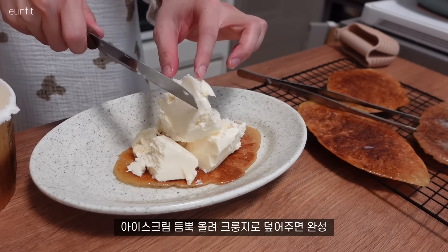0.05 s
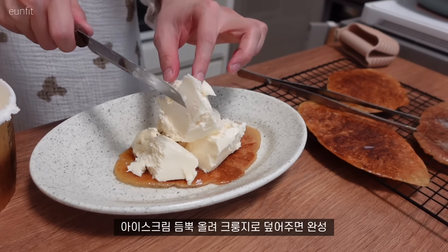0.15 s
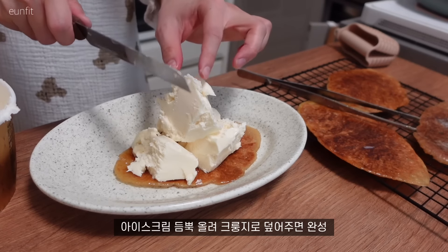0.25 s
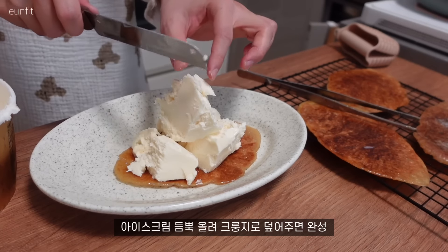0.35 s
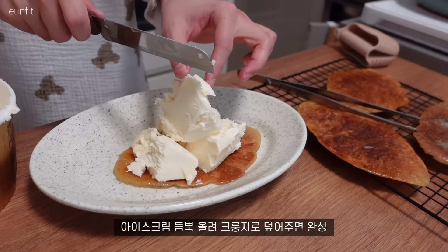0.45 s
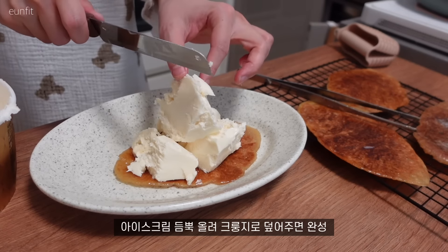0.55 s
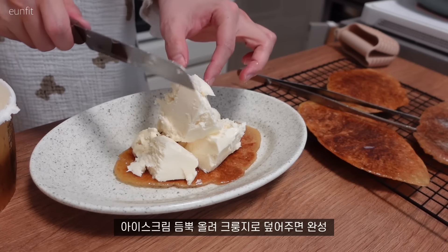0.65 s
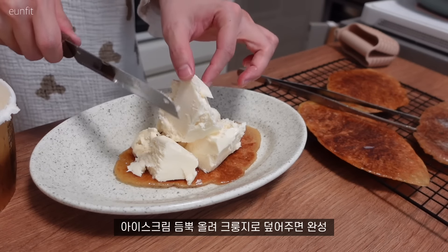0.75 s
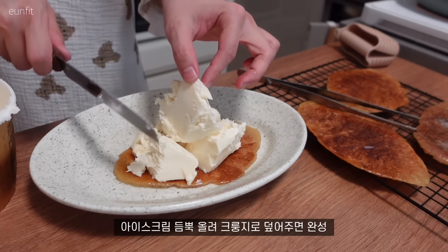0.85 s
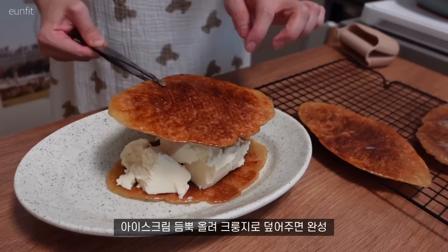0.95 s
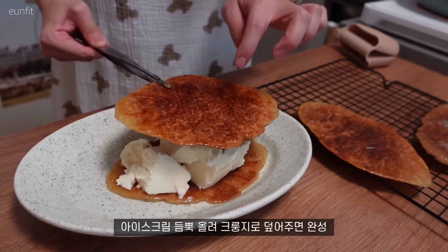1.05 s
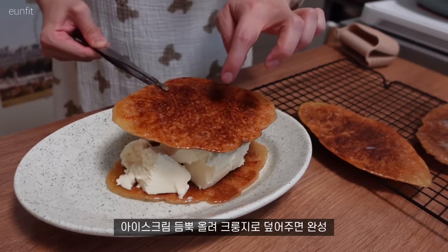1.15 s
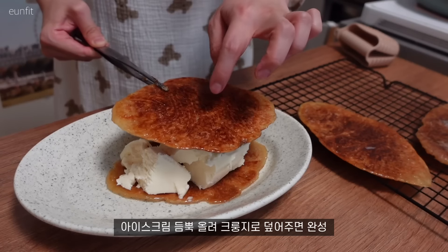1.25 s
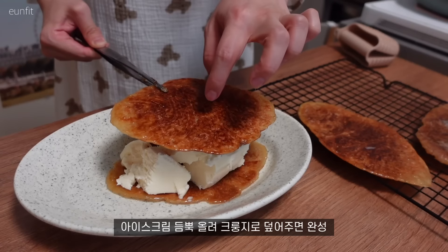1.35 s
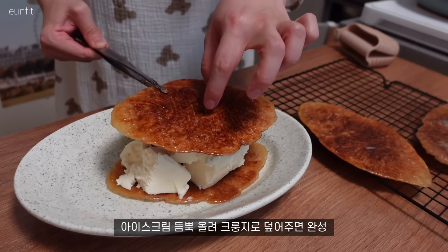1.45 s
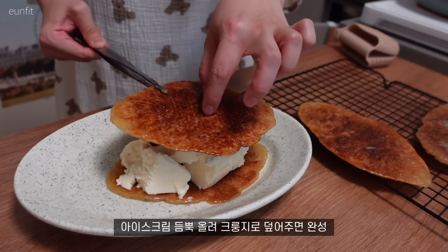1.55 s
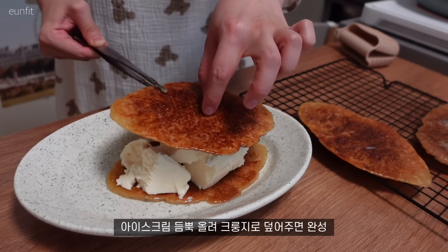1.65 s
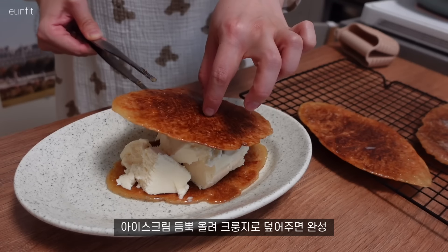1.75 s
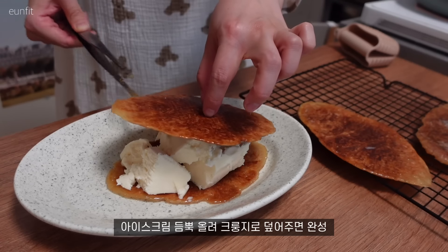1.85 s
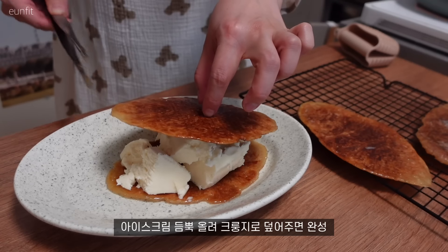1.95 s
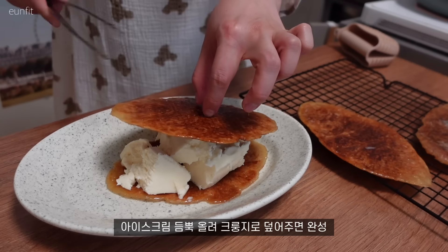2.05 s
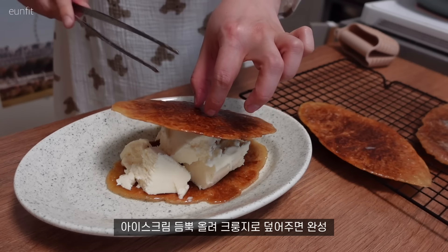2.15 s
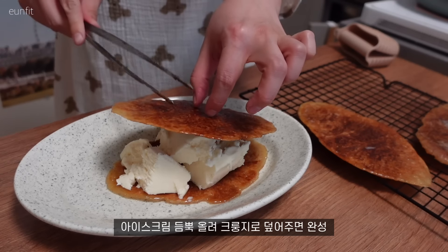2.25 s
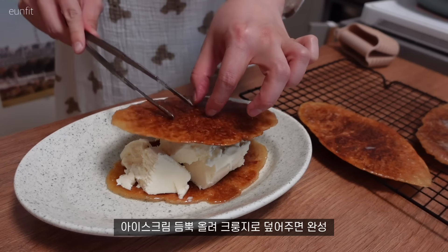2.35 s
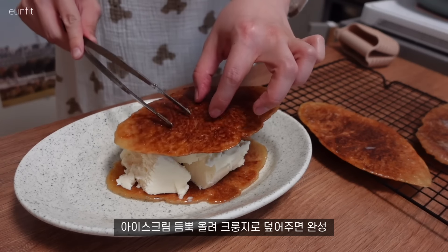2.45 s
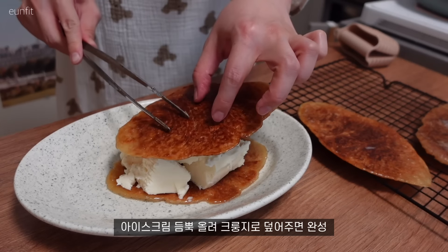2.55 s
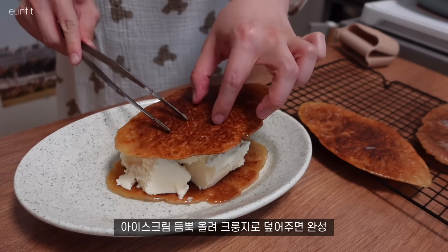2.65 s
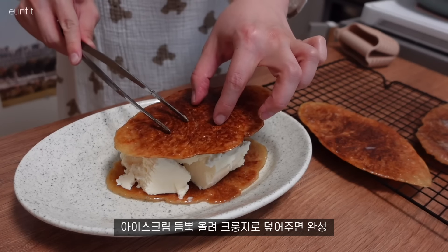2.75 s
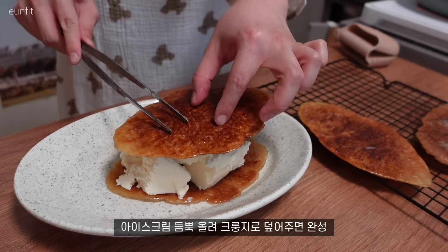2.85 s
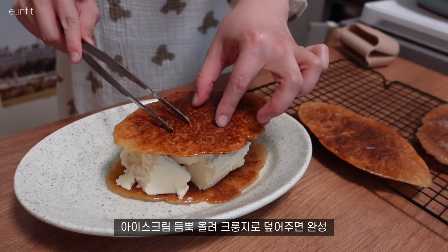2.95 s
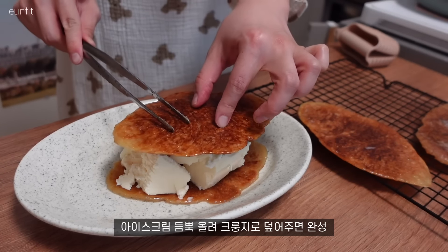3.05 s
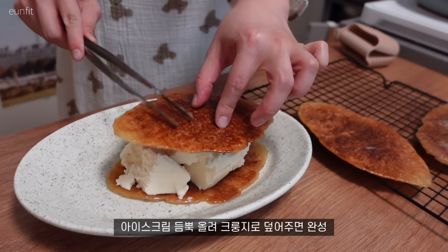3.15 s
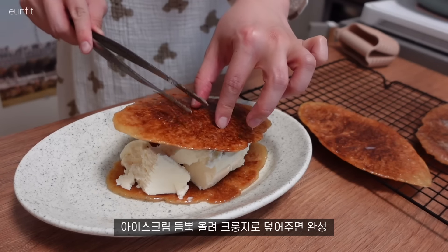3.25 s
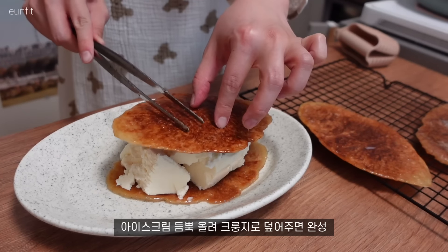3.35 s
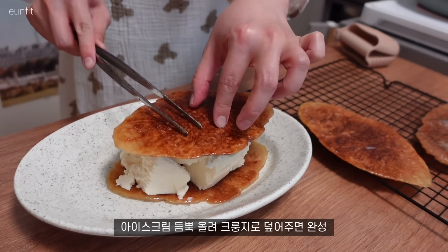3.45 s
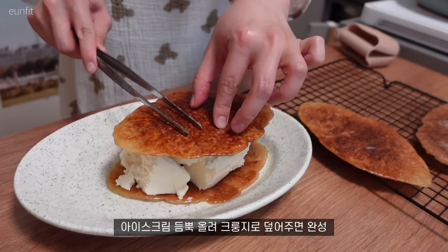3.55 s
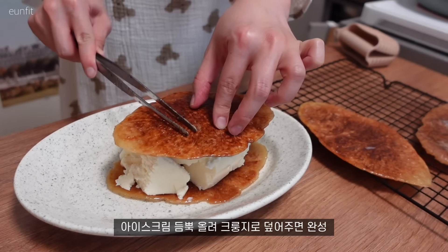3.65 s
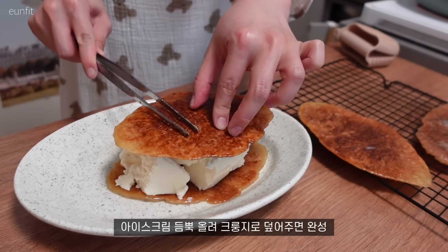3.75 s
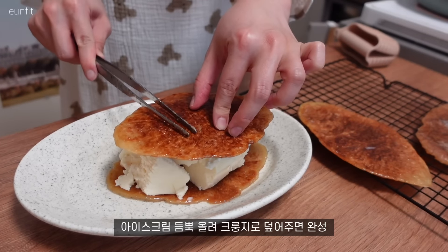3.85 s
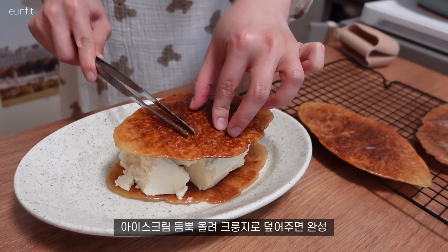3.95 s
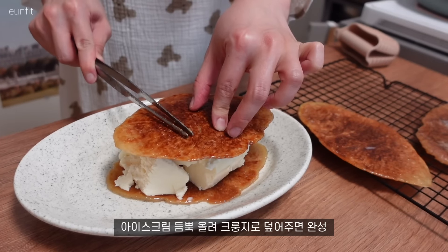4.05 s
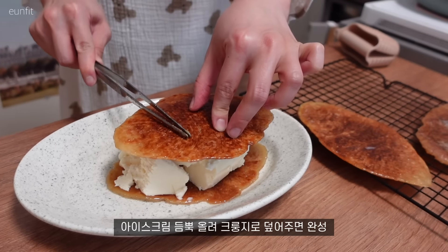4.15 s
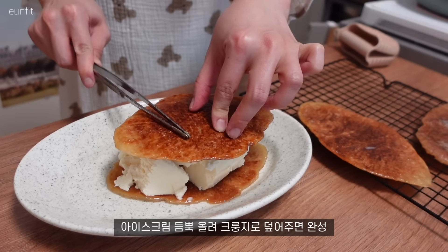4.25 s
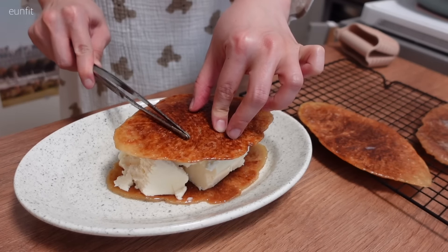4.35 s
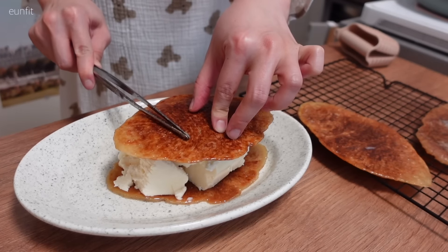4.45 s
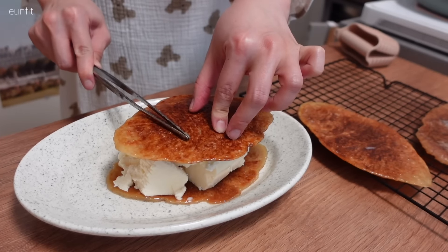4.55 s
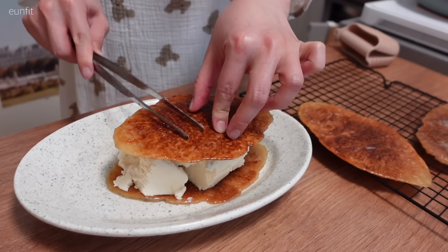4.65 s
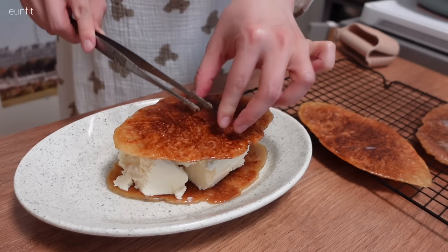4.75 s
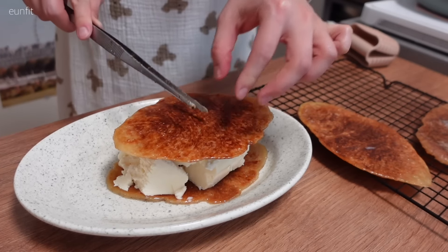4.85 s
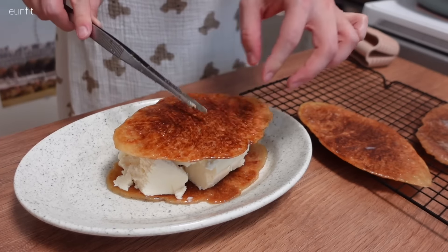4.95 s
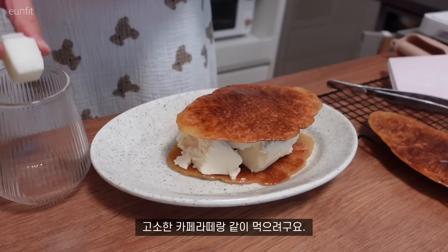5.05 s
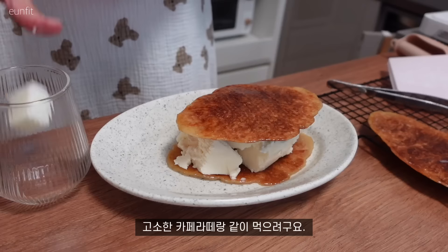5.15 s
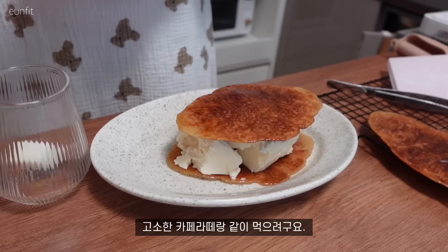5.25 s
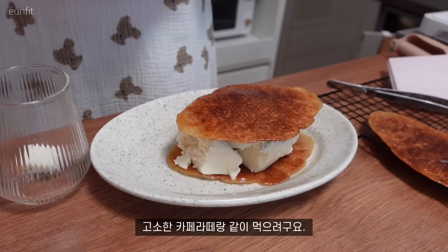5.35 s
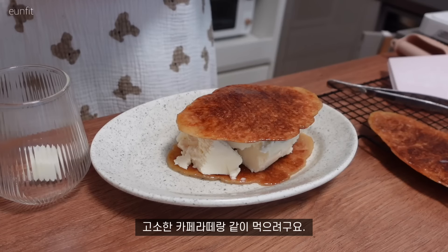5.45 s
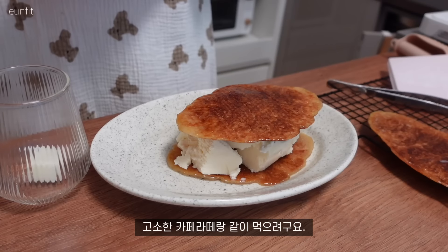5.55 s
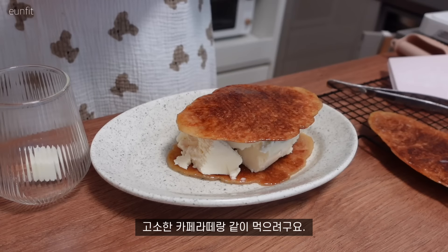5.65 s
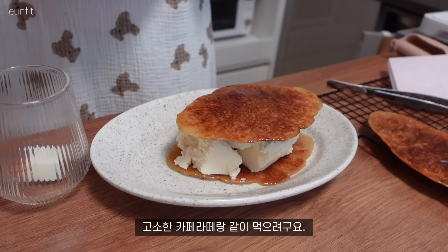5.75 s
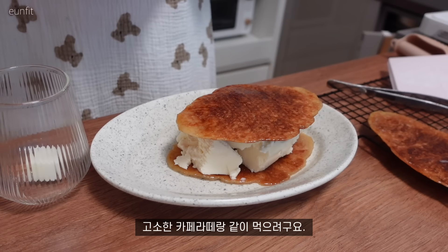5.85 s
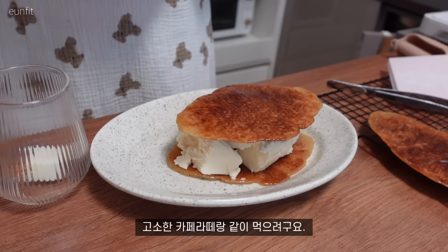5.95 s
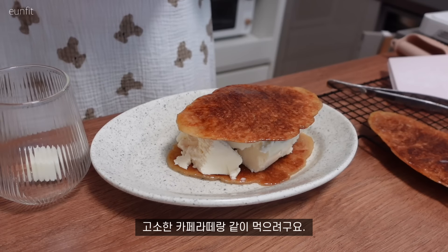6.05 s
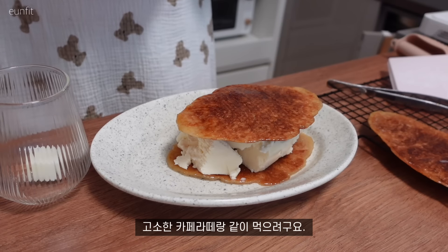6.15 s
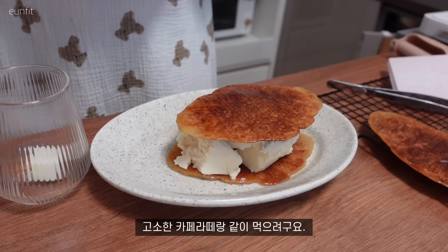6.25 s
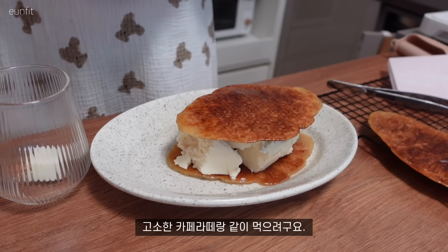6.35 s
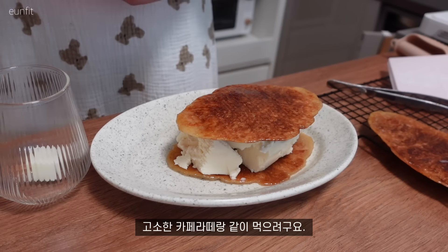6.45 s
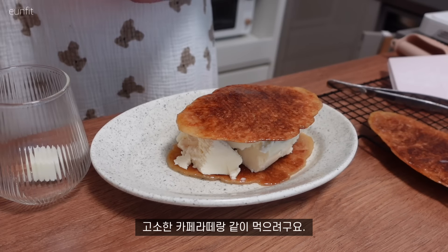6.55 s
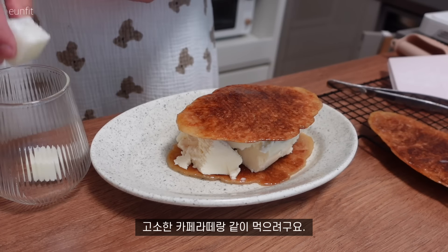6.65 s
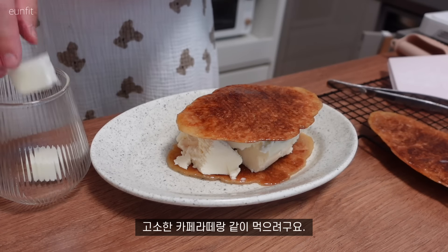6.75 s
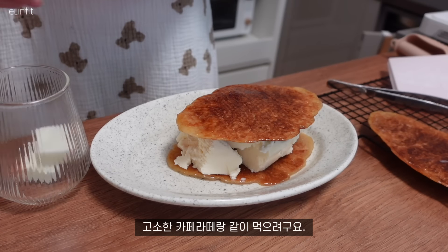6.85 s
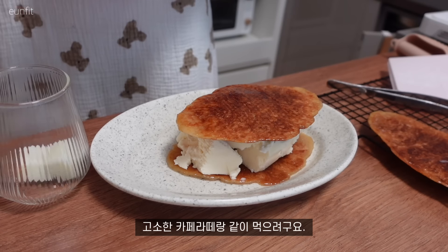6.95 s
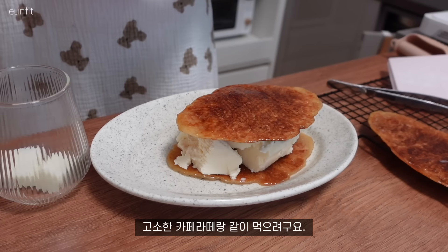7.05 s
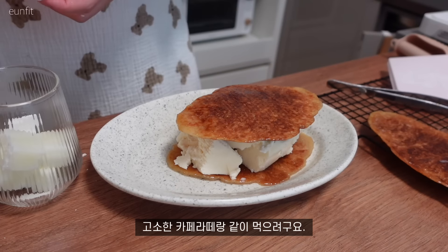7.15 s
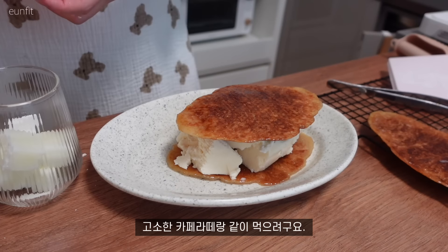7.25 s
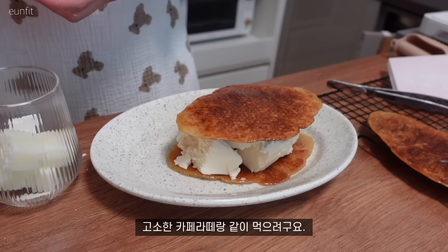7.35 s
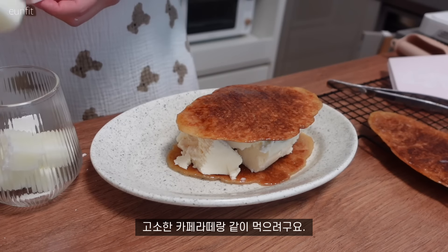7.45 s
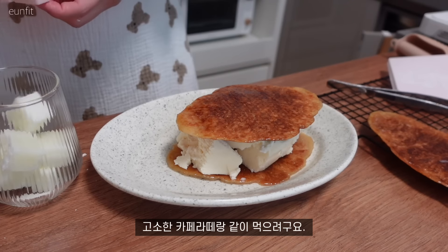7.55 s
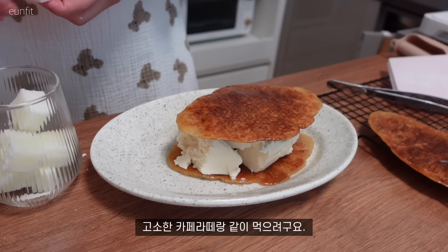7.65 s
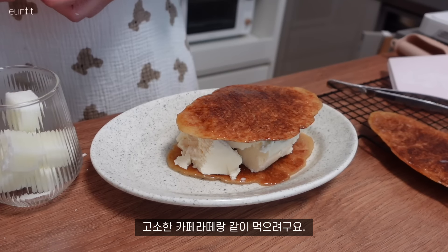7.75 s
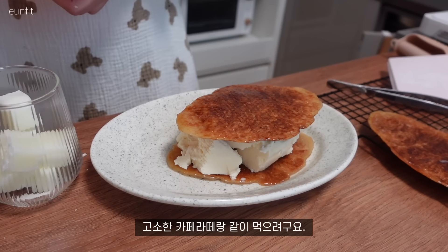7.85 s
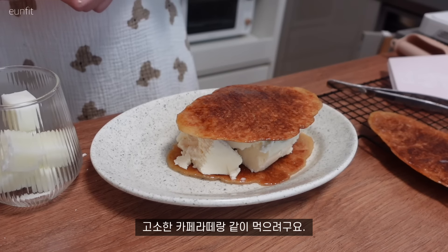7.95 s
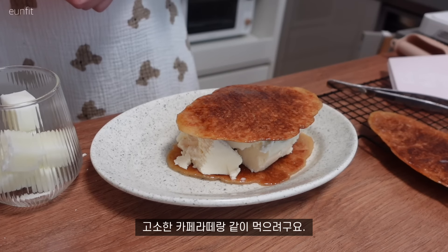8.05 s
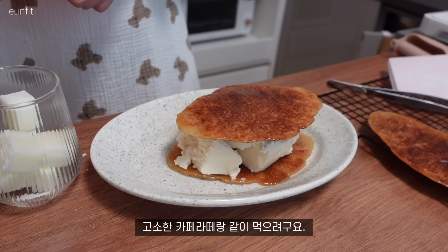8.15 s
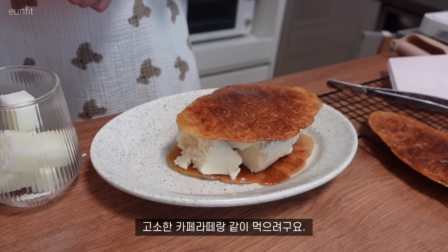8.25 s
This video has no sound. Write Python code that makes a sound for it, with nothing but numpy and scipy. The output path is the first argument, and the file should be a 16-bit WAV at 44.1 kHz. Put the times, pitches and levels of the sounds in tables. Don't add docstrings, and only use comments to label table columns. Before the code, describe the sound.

Quiet kitchen with dry taps and brittle crust cracking, followed by loud ringing ice drops into a glass, the last ones duller on piled ice.

```python
import sys
import numpy as np
from scipy import signal
from scipy.io import wavfile
from scipy.ndimage import uniform_filter1d

SR = 44100
rng = np.random.default_rng(int(sys.argv[2]) if len(sys.argv) > 2 else 0)


def gain_from_db(level_db):
    decades = np.asarray(level_db, float) / 20
    return 10 ** decades


def waveform_to_disk(signal):
    frames = np.transpose(np.atleast_2d(signal))
    scaled = np.clip(frames, -1, 1) * 32767
    samples = np.round(scaled).astype(np.int16)
    wavfile.write(sys.argv[1], SR, samples)


N = 366030


def evened(x):
    return x / np.sqrt(np.mean(x ** 2) + 1e-20)


def read(points, hz):
    f, value = np.transpose(points)
    return np.interp(np.log(hz + 1), np.log(f + 1), value)


def add(mix, s, sound):
    part = mix[round(s * SR):][:len(sound)]
    part += sound[:len(part)]


# [f/Hz, likeness 0-1]
LIKENESS = [(60, 0.24), (180, 0.73), (550, 0.64), (1650, 0.64), (4970, 0.72), (15000, 1)]


def noise(spectrum, patchy_db):
    frames = N // 256 + 5
    hz = np.fft.rfftfreq(1024, 1 / SR)
    a, b, c, d, patches = rng.standard_normal((frames, 513, 5)).T
    patches = uniform_filter1d(patches, size=10, axis=0)
    patches = evened(uniform_filter1d(patches, size=14, axis=1))
    same = read(LIKENESS, hz)[:, None]
    left = a + 1j * b
    right = same * left + np.sqrt(1 - same ** 2) * (c + 1j * d)
    gain = gain_from_db(read(spectrum, hz)[:, None] + patchy_db * patches)
    sound = signal.istft(np.array([left, right]) * gain, nperseg=1024, noverlap=768)[1]
    return evened(sound[:, :N])


# [f/Hz, level/dB]
HUSH = [(25, -55.5), (103, -11), (208, 2.5), (358, -2.5), (620, -15), (1200, -18.5), (7710, -32.5),
        (15200, -30)]
# [f/Hz, level/dB]
CLOTH = [(240, -30.5), (400, 4), (875, -2), (1250, 0.5), (3580, -11), (5980, -13), (12000, -19.5),
         (15600, -49)]
# [middle t/s, length t/s, level/dB]
GESTURES = [
    (1.13, 0.43, -56),
    (2.52, 0.6, -61),
    (3.528, 0.74, -60),
    (5.311, 1.7, -59.5),
    (6.46, 1.05, -57.5),
    (7.199, 0.46, -54),
    (7.894, 0.56, -59),
]
# [f/Hz, width f/Hz, level/dB]
HUM = [
    (360, 8.6, -71),
    (150, 60, -72),
]
# [f/Hz, width f/Hz, level/dB]
WHINE = (15680, 150, -86)
# [t/s, level/dB, f/Hz, length t/s]
BUMPS = [
    (1.128, -59.5, 120.8, 0.21),
    (4.188, -59, 150, 0.4),
    (6.937, -53, 56, 0.092),
    (7.125, -52, 40.3, .03),
    (7.617, -62, 44.2, 0.054),
    (7.961, -54.5, 665, 0.023),
    (8.036, -48, 684, 0.013),
    (8.17, -55, 684, 0.018),
]


def air():
    t = np.arange(N) / SR
    effort = gain_from_db(-59.5)
    for s, length, db in GESTURES:
        effort = effort + gain_from_db(db) * np.exp(-(2 * (t - s) / length) ** 2)
    rustle = gain_from_db(-9.0) * effort * noise(CLOTH, patchy_db=3.0)
    tones = np.zeros(N)
    for hz, width, db in (*HUM, WHINE):
        waver = uniform_filter1d(rng.standard_normal((2, N)), size=int(SR / width))
        tone = waver[0] * np.cos(2 * np.pi * hz * t) + waver[1] * np.sin(2 * np.pi * hz * t)
        tones += gain_from_db(db) * evened(tone)
    for s, db, hz, length in BUMPS:
        tones += gain_from_db(db) * np.exp(-(2 * (t - s) / length) ** 2) * np.sin(2 * np.pi * hz * t)
    hush = gain_from_db(-61 + 0.85) * noise(HUSH, patchy_db=2.36)
    return (hush + rustle + tones) * gain_from_db([[.45], [-.45]])


# [f/Hz, t/s]
ROOM = [(150, 0.18), (600, 0.44), (2000, 0.4), (6000, 0.34), (14000, 0.29)]


def room(x, apart, swell_s):
    taps = np.zeros((2, 30000))
    at = np.arange(200, 30000, 20) + rng.integers(0, 20, (2, 1490))
    np.put_along_axis(taps, at, rng.choice([-1., 1.], at.shape), 1)
    hz, t, z = signal.stft(taps, SR, nperseg=256)
    z = z * gain_from_db(-60 * t / read(ROOM, hz)[:, None]) * (1 - np.exp(-t / swell_s))
    mid, side = signal.istft(z, SR, nperseg=256)[1]
    tail = np.array([mid + apart * side, mid - apart * side])
    return signal.fftconvolve(x[None], tail / np.linalg.norm(tail[0]), axes=1)[:, :N]


# [t/s, length t/s, level/dB, f/Hz]
CRUMBLE = [
    (1.871, 0.065, -50, 1480),
    (3.661, 0.12, -56.5, 5000),
    (3.881, 0.12, -64, 4500),
    (4.225, 0.03, -76, 4000),
    (4.721, .11, -52.5, 3530),
    (6.202, 0.091, -53.5, 2210),
    (6.406, 0.076, -56.5, 1700),
]


def crumble():
    out = np.zeros(N)
    for s, length, db, hz in CRUMBLE:
        swell = np.hanning(int(1.48 * length * SR))
        size, luck = rng.standard_normal(SR // 2), rng.random(SR // 2)
        grains = size * abs(size) * (luck < 5000 / SR)
        flakes = signal.butter(2, [0.31 * hz, 2.0 * hz], "band", fs=SR)
        crumbs = evened(signal.lfilter(*flakes, grains[:len(swell)]))
        add(out, s - 0.65 * length, gain_from_db(db) * crumbs * swell)
    return out


# [t/s, knock level/dB, f/Hz, splinter level/dB]
TAPS = [(1.716, -56, 750, -46), (1.834, -39.5, 720, -70), (1.843, -38.5, 890, -38), (1.845, -46, 3450, -58),
        (1.879, -36.5, 800, -62), (1.879, -36.5, 1600, -28.5), (1.894, -51, 960, -40),
        (2.27, -48.5, 1370, -54), (2.346, -28.5, 1290, -33), (2.347, -41, 2600, -60),
        (2.362, -36, 2150, -70), (2.617, -47.5, 2950, -58), (2.689, -54, 2830, -70),
        (2.869, -46, 1570, -37), (3.177, -55, 2330, -41), (3.267, -38, 2930, -31), (3.367, -27, 1460, -44)]
# [t/s, knock level/dB, splinter level/dB]
CRACKS = [(3.635, -41, -31.5), (3.654, -53, -37), (3.68, -51, -37.5), (3.823, -45.5, -32),
          (3.846, -52, -37.5), (3.927, -50, -36), (3.939, -56, -30.5), (4.069, -52, -38.5),
          (4.148, -51, -30.5), (4.188, -50, -36), (4.205, -33, -21.5), (4.321, -62, -41),
          (4.362, -47, -24.5), (4.427, -56, -33), (4.475, -51, -25.5), (4.5, -45.5, -29.5),
          (4.513, -57, -33), (4.523, -57, -33), (4.555, -55, -42), (4.624, -40, -40), (4.669, -45, -30.5),
          (4.677, -49, -28), (4.699, -40.5, -31), (4.714, -48, -27), (4.729, -28, -26), (4.735, -35.5, -27),
          (4.757, -46, -30), (4.766, -39.5, -43.5), (4.775, -32.5, -17)]
# [t/s, knock level/dB, f/Hz, splinter level/dB]
TICKS = [(5.161, -61, 750, -41.5), (5.787, -48, 2370, -70), (5.874, -47, 2300, -63),
         (5.98, -40.5, 1480, -42), (6.083, -61, 2500, -60), (6.161, -49, 2220, -41),
         (6.176, -42.5, 1590, -31), (6.189, -48, 2230, -26.5), (6.22, -31, 1610, -34),
         (6.227, -50, 1700, -18), (6.231, -33.5, 1600, -16), (6.384, -47, 2390, -36.5),
         (6.402, -34, 1900, -50), (6.424, -31, 1850, -40.5), (6.439, -44, 1540, -63.5),
         (6.551, -54, 1384, -67.5), (6.565, -42, 1560, -64), (6.614, -51, 1470, -47),
         (6.646, -46.5, 2360, -39.5), (7.298, -42.5, 1480, -39), (7.813, -44, 1600, -72),
         (7.932, -46.5, 1510, -58)]


def snaps():
    crust_hz = 3010
    tap_t60, crack_t60, tick_t60 = 0.021, 0.025, 0.015
    out = crumble()
    t = np.arange(900) / SR
    rows = [(*row, tap_t60) for row in TAPS]
    rows += [(s, knock_db, crust_hz, puff_db, crack_t60) for s, knock_db, puff_db in CRACKS]
    rows += [(*row, tick_t60) for row in TICKS]
    for s, knock_db, hz, puff_db, t60 in rows:
        grit = rng.standard_normal(len(t))
        fade = gain_from_db(-60 * t / t60) * (1 - np.exp(-t / 0.00022))
        crust = signal.butter(2, [.74 * hz, 1.38 * hz], "band", fs=SR)
        knock = signal.lfilter(*crust, 4.5 * (t == 0) + grit * fade)
        flake_hz = 8500 * np.exp(0.23 * np.tanh(grit[-1]))
        bright = signal.butter(1, [0.53 * flake_hz, 1.6 * flake_hz], "band", fs=SR)
        puff = signal.lfilter(*bright, grit[::-1] * fade ** 3)
        add(out, s, gain_from_db(knock_db) * knock / abs(knock).max())
        add(out, s, gain_from_db(puff_db - 4.5) * puff / abs(puff).max())
    return out * gain_from_db([[.2], [-.2]]) + gain_from_db(-7.0) * room(out, apart=0.64, swell_s=.004)


def ring(pitches, modes):
    t = np.arange(SR) / SR
    out = np.zeros(SR)
    for hz, (db, t60) in zip(pitches, modes):
        out += gain_from_db(db - 60 * t / t60) * np.sin(2 * np.pi * hz * t)
    return out


def click(colour):
    log_gain = np.log(gain_from_db(read(colour, abs(np.fft.fftfreq(2048, 1 / SR)))))
    pulse = np.fft.ifft(np.exp(np.conj(signal.hilbert(log_gain)))).real[:1024]
    return pulse / abs(pulse).max()


# [f/Hz, level/dB, t60 t/s]
THUD = [(189.8, -14, 0.17), (275, -8, 0.037), (333, -8.5, 0.07), (550, -21, .03), (643, -8, 0.084),
        (669, -3, 0.056), (828, -15.5, 0.12), (1184, -26.5, 0.011), (1447, -19.5, .025), (1600, -4.5, 0.02),
        (2178, -8.5, 0.025), (2290, -15.5, 0.014)]
RIM_HZ = (1281, 1276)
# [level/dB, t60 t/s]
RIM = [(0, 2.4), (-14, 2.2)]
# [t/s, level/dB]
RIM_BLOWS = [
    (5.257, -40),
    (5.499, -55),
    (6.819, -43),
    (6.876, -27.5),
    (6.942, -24.5),
    (7.089, -32),
]


def ice(blows, colour, pitches, modes, end):
    knocks, rings = np.zeros(N), np.zeros(N)
    t = np.arange(5000) / SR
    thud = ring([m[0] for m in THUD], [m[1:] for m in THUD])[:SR // 3]
    parts = [ring(hz, part) for hz, part in zip(pitches, modes)]
    crack = click(colour)
    for s, db in RIM_BLOWS:
        if end - 1 < s < end:
            add(rings, s, gain_from_db(db) * ring(RIM_HZ, RIM))
    for s, crack_db, thud_db, *rings_db in blows:
        grit, luck = rng.standard_normal(len(t)), rng.random(len(t))
        splinters = .2 * grit * gain_from_db(-60 * t / .012)
        bounces = grit * (luck < 1500 / SR)
        chatter = 0.13 * bounces * t / 0.055 * np.exp(1 - t / 0.025)
        body = gain_from_db(thud_db) * thud
        body[:1024] += gain_from_db(crack_db) * crack
        add(knocks, s, signal.fftconvolve((t == 0) + chatter, body))
        add(knocks, s, gain_from_db(crack_db) * signal.fftconvolve(splinters, crack))
        for part, db in zip(parts, rings_db):
            add(rings, s, gain_from_db(db) * part)
    echo = gain_from_db(-2.5) * room(knocks + gain_from_db(-3) * rings, apart=0.17, swell_s=0.0016)
    aside = gain_from_db(-15.5) * np.roll(rings, shift=2) * [[1], [-1]]
    wet = (knocks + rings) * gain_from_db([[.3], [-.3]]) + aside + echo
    wet = signal.sosfilt(signal.butter(6, 145, "high", fs=SR, output="sos"), wet)
    return wet * np.clip((end - np.arange(N) / SR) / 0.0093, 0, 1)


CHANGES = (6.157, 7.137)
# [t/s, crack level/dB, thud level/dB, low base ring level/dB, high base ring level/dB]
FIRST = [
    (5.257, 7.5, -5.5, 0, -7),
    (5.3, -18.5, -15, -14, -23),
    (5.4997, 0, -17.5, -26, -20.5),
    (5.545, -30, -22, -45, -50),
    (5.592, -34, -48, -49, -56.5),
    (5.634, -22.5, -29, -48, -64),
]
# [f/Hz, level/dB]
CRACK = [(180, -54.5), (300, -5.5), (650, 7), (2200, 3), (3530, -9), (5460, 0), (9000, -5), (13000, -36)]
BASE_HZ = (5281, 5378, 5583, 5631, 5698, 5965), (8845, 10480, 10597, 13360, 13487, 14580)
# [level/dB, t60 t/s]
BASE = [(-11.5, .08), (-11.5, .1), (-12, 0.25), (0, 0.12), (-5.5, 0.15), (-21.5, .08)], [(-6.5, 0.12),
        (-5, 0.056), (5.5, 0.049), (-9, 0.16), (-11.5, 0.088), (-19, .08)]


def first_cube():
    return ice(FIRST, CRACK, BASE_HZ, BASE, CHANGES[0])


# [t/s, crack level/dB, thud level/dB, low wall ring level/dB, high wall ring level/dB]
LATER = [(6.819, -30.5, -30, -13.5, -26), (6.876, 0, -5, -32, -40), (6.942, -12, -25.5, -8, -15),
         (6.952, -15, -35, -42, -19), (7.001, -25, -23.5, -50, -49), (7.052, -23.5, -51, -53, -50),
         (7.089, -14, -20, -50, -38), (7.599, -28, -46.5, -55, -42), (7.602, -14.5, -28, -55, -49),
         (7.632, -26, -33.5, -24, -32), (7.841, -57, -46, -29.5, -51)]
# [f/Hz, level/dB]
CLACK = [(180, -26.5), (300, -8.5), (520, -5.5), (1600, 1.5), (2360, -10.5), (3000, -14.5), (8300, -19),
         (14900, -61.5)]
# [f/Hz, level/dB]
PILE = [(150, -7), (300, -9.5), (690, 2), (1300, -7), (2100, -8), (3000, -21), (8300, -23.5),
        (14900, -44.5)]
WALL_HZ = [
    (3364, 3387, 5766),
    (7224, 7278, 8231, 8420, 8850, 11100, 11430, 12840, 13330, 13490, 14295, 14560, 15080),
]
# [level/dB, t60 t/s]
WALL = [(-24.5, 0.57), (-14, 0.55), (-31.5, 0.36)], [(-2.5, 0.0367), (-26, 0.079), (-10, 0.062),
        (-12.5, 0.038), (-10.5, 0.046), (-10, 0.048), (-15.5, 0.053), (-15, 0.064), (-9, 0.08),
        (-26.5, .12), (-21, .1), (-16, 0.063), (-13, 0.059)]
# [level/dB, t60 t/s]
PACKED_WALL = [(-31, .15), (-18, .14), (-16, 0.051)]


def later_cubes():
    second = [blow for blow in LATER if blow[0] < CHANGES[1]]
    third = [blow for blow in LATER if blow[0] > CHANGES[1]]
    on_ice = ice(second, CLACK, WALL_HZ, WALL, CHANGES[1])
    on_heap = ice(third, PILE, WALL_HZ, (PACKED_WALL, WALL[1]), N / SR + 1)
    return on_ice + on_heap


def scene():
    return air() + snaps() + first_cube() + later_cubes()


def low_pass(x):
    return signal.sosfilt(signal.butter(12, 16790, fs=SR, output="sos"), x)


def record(dry):
    dry = signal.sosfilt(signal.butter(2, 50, "high", fs=SR, output="sos"), dry)
    dry = signal.oaconvolve(dry, signal.firwin(127, 16300, fs=SR)[None], "same")
    power = uniform_filter1d((dry ** 2).mean(0), size=90)
    power_db = 10 * np.log10(abs(power) + 1e-12)
    fall = np.arange(N) * 280. / SR
    held_db = np.maximum.accumulate(power_db + fall) - fall
    over_db = np.maximum(held_db + 16.5, 0)
    ducked = dry / gain_from_db(.85 * uniform_filter1d(over_db, size=30))
    rounded = .75 * np.tanh(ducked / .75)
    return low_pass(rounded)


dry = scene()
out = record(dry)
waveform_to_disk(out)
```